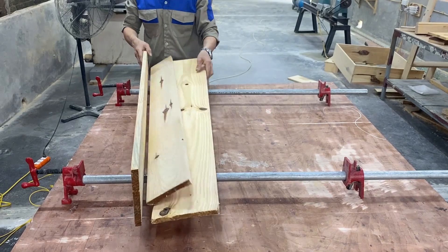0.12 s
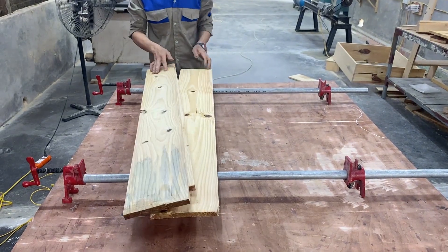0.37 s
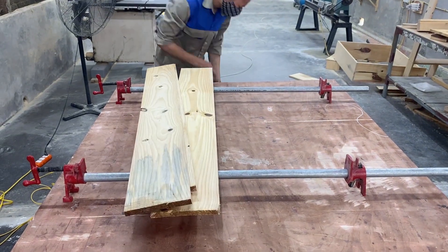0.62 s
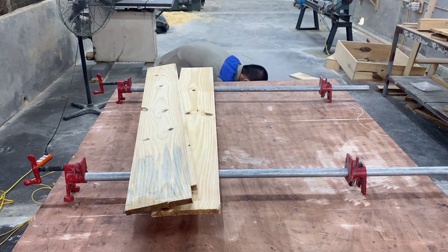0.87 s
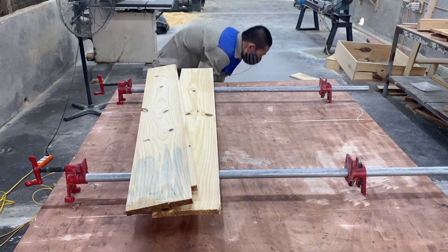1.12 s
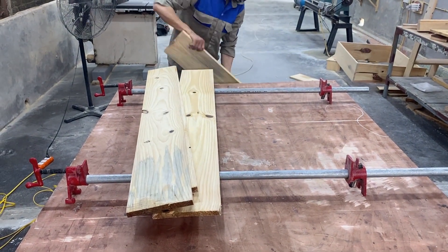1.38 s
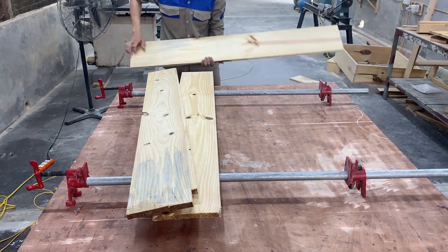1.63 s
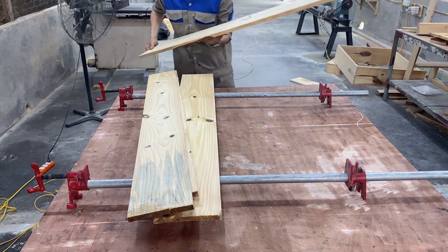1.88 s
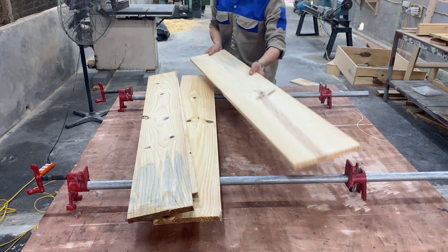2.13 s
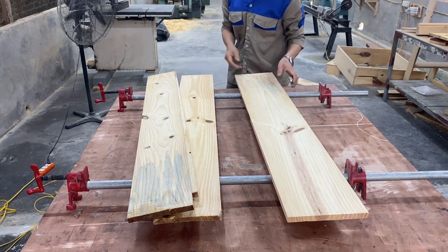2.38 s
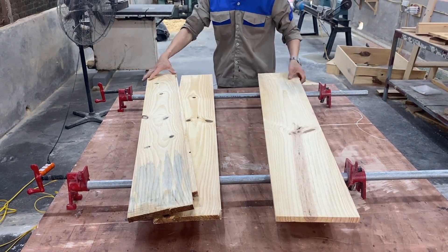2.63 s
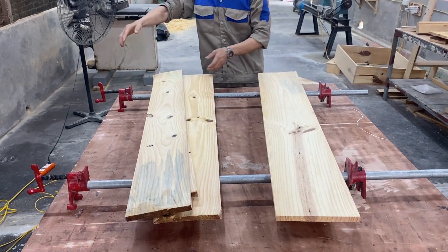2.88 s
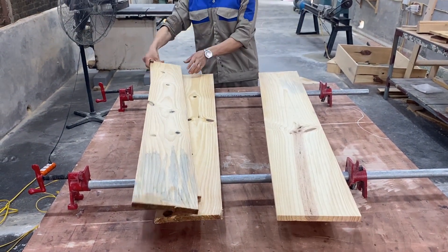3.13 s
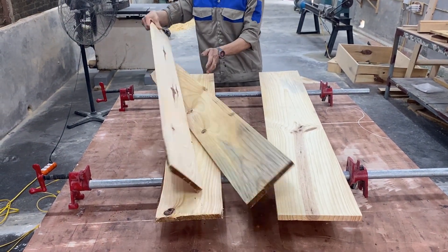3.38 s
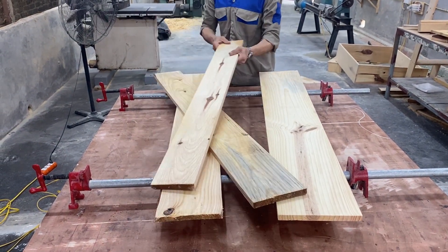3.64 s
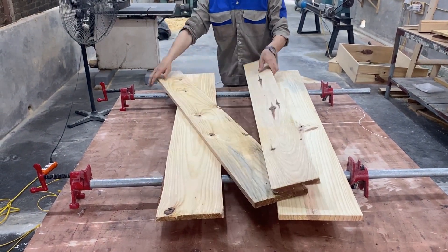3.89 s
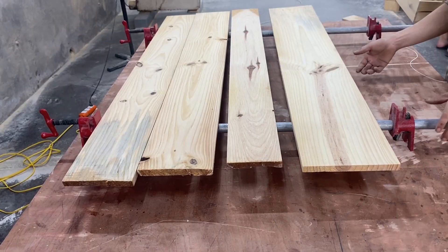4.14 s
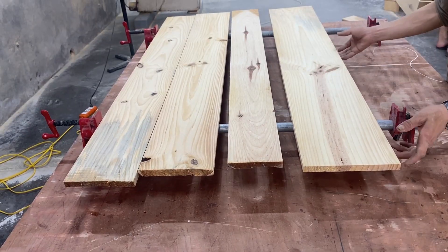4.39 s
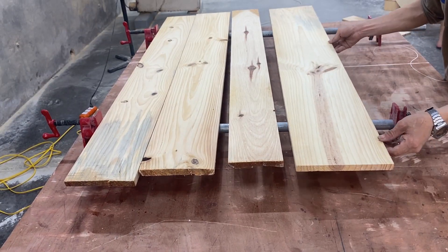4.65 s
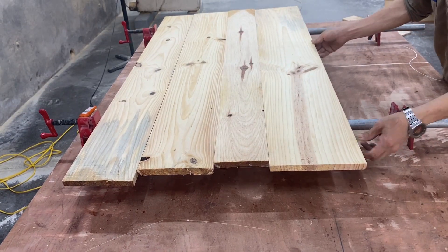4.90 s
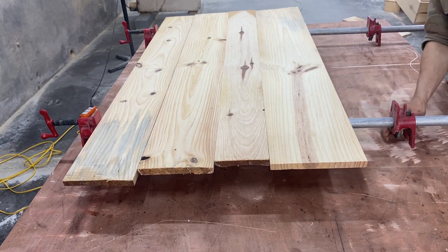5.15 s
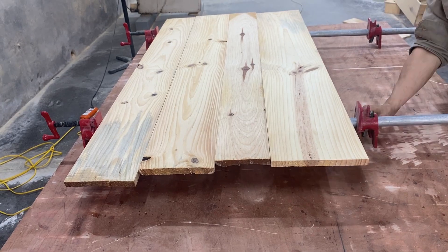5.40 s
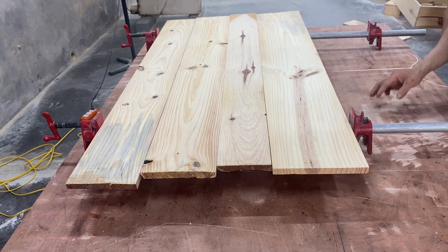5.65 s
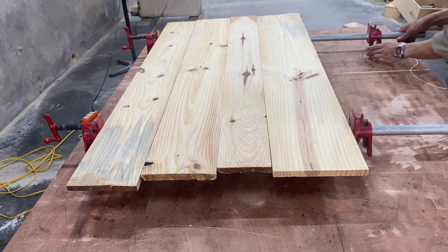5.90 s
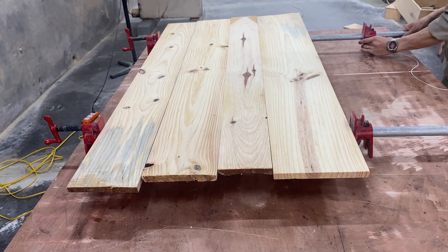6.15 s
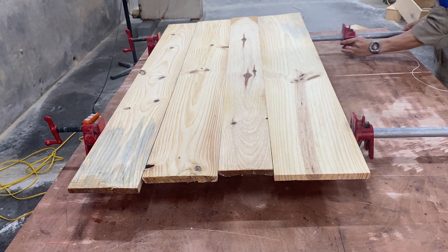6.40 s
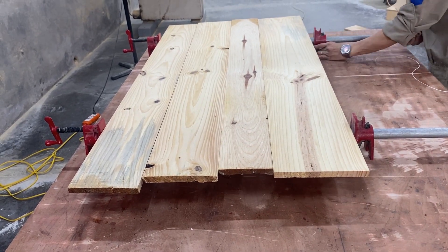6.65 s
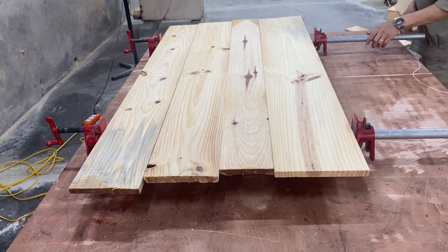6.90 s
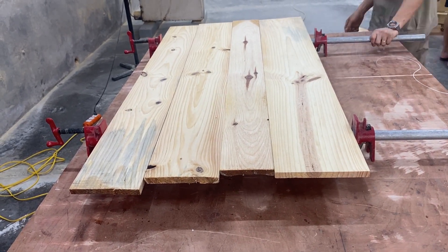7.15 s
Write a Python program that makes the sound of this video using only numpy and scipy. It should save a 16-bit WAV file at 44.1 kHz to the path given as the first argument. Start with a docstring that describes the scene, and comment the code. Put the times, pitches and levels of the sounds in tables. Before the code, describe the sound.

In a large workshop with a short echo, heard close to the bench, several pine boards clatter down in hard, dry knocks from 0.1 to 0.4 s, with low bench rumble. From 0.5 to 2.1 s it is nearly quiet, with faint scrapes and a soft wood rub near 1.3. Another board lands at 2.2-2.35, settling with lighter knocks until 2.9. Boards rasp and clack at 3.1-3.5, with a sharp snap at 3.45, and a hard hit at 3.83. A distant bird whistles faintly at 3.0-3.2, then more clearly at 3.95-4.4. Sound briefly vanishes at 3.93; afterwards the thin hiss is louder. Boards slide together, striking at 4.75. Steel scrapes, high ringing and clamp rattle come at 5.3, a solid knock at 5.6, then busy knocks, rasps and rattles from 6.1 to 6.9. A low rumble swells before another tiny dropout at 7.2.

```python
"""Boards at work in a large workshop, with a thin hiss of coloured noise that is louder after 3.9 s.
From the start pine boards are dropped, knocked together and slid over steel clamp pipes on a bench; a low
rumble of coloured noise swells as they are moved. Blows ring boards and bench as dying tones; random slips
make wood rasp, steel hiss with grit, and pipes sing near 8 kHz. A bird, made of wavering sines, whistles far
off from 3 s; sound almost vanishes before 4 s and at 7.2 s; from 5.3 s a loose clamp jaw rattles under jolts."""
import sys
import numpy as np
from scipy import signal
from scipy.fft import rfft, irfft
from scipy.io import wavfile
from scipy.ndimage import uniform_filter1d

SR = 44100
rng = np.random.default_rng(int(sys.argv[2]) if len(sys.argv) > 2 else 0)


def amplitude_ratio(level_db):
    """Convert a level in decibels to the matching linear amplitude (field) ratio."""
    exponent = np.asarray(level_db, float) / 20
    return 10 ** exponent


def master(y):
    """Save y as 16-bit WAV."""
    cut = np.clip(np.atleast_2d(y).T, -1, 1)
    pcm = np.round(cut * 32767)  # scale
    wavfile.write(sys.argv[1], SR, pcm.astype(np.int16))


N = 320695  # length in samples

# Low rumble of the bench as boards are moved, colour: [f/Hz, relative level per Hz/dB]
RUMBLE_COLOUR = [(12, -28.5), (20, -6.5), (48, -12.5), (91, -1.5), (145, -11), (183, -14.5), (282, -32),
                 (320, -30), (420, -54), (700, -120)]
# Low rumble of the bench, typical loudness over time: [t/s, level/dB]
RUMBLE_LEVEL = [(0.0, -28), (0.22, -48), (0.4, -28.5), (0.58, -50), (1.0, -53), (1.31, -56), (2.2, -59),
                (2.35, -35), (2.69, -59), (2.83, -44), (3.15, -60), (3.501, -37.5), (3.81, -46),
                (4.07, -43.5), (4.82, -41), (5.37, -43.5), (5.67, -35.5), (5.93, -51.5), (6.36, -38.5),
                (6.84, -35), (7.15, -27.5), (7.27, -40.5)]
# Thin hiss of the hall, colour of the noise: [f/Hz, relative level per Hz/dB]
AIR_COLOUR = [(120, -26), (200, -4), (397, -10), (748, -9), (880, -12.5), (1510, -16.5), (1810, -15),
              (4390, -27.5), (4980, -19), (6530, -17.5), (8260, -33), (15000, -49)]
# Thin hiss of the hall, typical loudness over time: [t/s, level/dB]
AIR_LEVEL = [(0, -68.5), (3.93, -63.5), (3.94, -58), (7.27, -56.5)]
# Wood dragged over wood or steel:
# [peak t/s, rise/s, fall/s, rasp level before a 1 dB lift/dB, pitch that rings most f/Hz,
#  grind against rasp before a 4 dB lift/dB]
SLIDES = [(.008, .008, .15, -37.5, 347, -19.5), (.125, .1, 0.009, -42.5, 850, -14.5),
          (1.016, .012, .1, -59.5, 714, -21), (1.15, 0.009, .3, -46.5, 910, -16),
          (1.33, .2, .2, -34, 855, -14), (1.826, .03, 0.052, -58, 550, -9.5),
          (1.95, .12, .3, -65, 650, -4.5), (2.18, 0.33, .02, -64, 896, -12),
          (2.292, .04, 0.031, -29, 760, -37), (2.36, .05, 0.19, -25, 840, -24),
          (2.89, .01, .13, -21, 855, -25.5), (3.26, .01, 0.18, -24, 960, -25.5),
          (3.312, .04, 0.09, -17, 970, -40), (3.48, .01, 0.31, -37, 690, -11),
          (3.62, .35, .14, -33.5, 1220, -16.5), (3.96, .01, 0.085, -41, 500, -26),
          (4.068, .1, 0.16, -44, 375, -9), (4.228, .2, .3, -55.5, 510, -17),
          (4.418, .3, .25, -53.5, 900, -10), (4.75, .13, 0.011, -28.5, 940, -22.5),
          (4.898, .09, .14, -32.5, 420, -20), (5.0, .01, 0.24, -51, 392, -17),
          (5.176, .3, 0.32, -56.5, 530, -14), (5.24, .03, .08, -57.5, 1300, 3),
          (5.289, .006, .25, -29, 1290, -23), (5.345, .07, .1, -23.5, 1040, -23),
          (5.475, .025, .2, -32, 860, -25), (5.7, .02, .25, -37, 360, -29),
          (6.0, .3, 0.23, -58.5, 600, -10), (6.138, .07, 0.076, -27.5, 785, -24),
          (6.28, 0.18, 0.053, -42.5, 440, -22), (6.37, .08, .01, -22, 350, -28),
          (6.42, .03, 0.38, -25.5, 680, -20.5), (6.54, .1, .1, -31, 905, -27),
          (6.68, .01, .12, -37.5, 387, -17), (6.76, .1, 0.036, -43, 360, -10),
          (6.82, .01, .1, -36.5, 435, -17), (6.99, .3, 0.44, -36.5, 355, -16),
          (7.195, .5, .02, -35.5, 360, -17.5), (7.26, .04, .02, -56, 385, 10.5)]
# Typical tones of a board ringing freely: [f/Hz, level/dB, time to die by 60 dB t/s]
BOARD_MODES = [(217.4, -6, 0.056), (272.5, -0.5, 0.049), (346.8, 1.5, 0.037), (437.8, -3, 0.042),
               (515.2, -5, 0.045), (599.6, -4, 0.044), (663, -4, 0.041), (760, -4, 0.032),
               (845, -3.5, 0.044), (962, -0.5, 0.024), (1090, -3, 0.039), (1183.5, -5.5, 0.028),
               (1329.6, -1, 0.026), (1400, 0.5, 0.029), (1614, -4, .025), (1797, -8, 0.022),
               (2029, -11, 0.029)]
# Dull grind of a stroke, colour: [f/Hz, relative level per Hz/dB]
GRIND_COLOUR = [(1100, -23.5), (1800, 3), (2800, 1.5), (4500, -10.5), (7000, -24), (11000, -42.5)]
# Treble of strokes, sliding steel and snaps, colour: [f/Hz, relative level per Hz/dB]
TREBLE_COLOUR = [(2500, -21), (4500, 2.5), (7000, -2), (10000, -2), (15000, -11.5), (16000, -20)]
# Gritty hiss of steel sliding on steel: [peak t/s, rise/s, fall/s, level/dB]
STEEL_SLIDES = [(0.032, .03, .3, -62.5), (1.32, 0.36, .5, -63.5), (1.898, .15, 0.99, -69.5),
                (3.47, .01, 0.27, -62.5), (4.075, .08, .15, -57.5), (4.418, .3, .2, -69),
                (4.749, 0.12, .02, -53), (5.06, .08, 0.22, -58), (5.32, 0.064, .17, -43.5),
                (5.5, .15, 0.36, -60.5), (5.75, 0.27, .3, -72), (5.9, 0.011, .4, -61),
                (6.141, .05, 0.098, -50), (6.42, 0.083, 0.38, -43), (6.499, 0.11, 0.16, -47),
                (6.69, .03, .4, -57), (6.85, .005, .15, -49), (6.89, 0.017, 0.28, -46.5),
                (6.95, .15, .04, -50), (7.195, .6, .02, -57), (7.245, .03, 0.091, -49.5)]
# How long the hall echoes at each pitch: [f/Hz, time to die by 60 dB t/s]
HALL_DECAY = [(80, 0.5), (250, 0.5), (800, 0.3), (2000, 0.33), (5000, 0.36), (12000, 0.24)]
# Blows: [t/s, level before a 2 dB lift/dB, pitch that rings most f/Hz,
#         bench thump against board peak/dB, crack against board peak/dB]
KNOCKS = [(0.104, -36, 1350, -30, -30), (0.133, -5, 1333, -25.5, -17), (0.192, -3.5, 1130, -19.5, -9),
          (0.256, -6.5, 1140, -28, -10.5), (0.394, -5, 908, -17, -12), (0.401, -6, 1050, -25, -16),
          (0.694, -54, 1620, -30, -22), (1.142, -34, 1630, -22, -15.5), (1.886, -47, 794, -19, -21),
          (2.152, -49, 658, -1, -4.5), (2.2, -8.5, 1070, -13.5, -19.5), (2.253, -7, 1430, -27, -19),
          (2.34, -9.5, 1110, -20.5, -16.5), (2.519, -24, 570, -16, -22), (2.627, -12.5, 1234, -19, -20),
          (2.659, -20.5, 1400, -16, -23.5), (2.702, -35, 1390, -3, -14), (2.83, -19, 1495, -15, -18.5),
          (2.874, -13.5, 1164, -11, -21), (2.897, -13.5, 1090, -16, -15.5), (3.112, -23, 1160, -6.5, -22),
          (3.237, -15.5, 1410, -10.5, -20), (3.279, -10.5, 1050, -12, -16), (3.308, -9.5, 1440, -15, -16),
          (3.329, -12.5, 585, -15.5, -20.5), (3.448, -4.5, 1310, -27.5, -9.5),
          (3.831, -4, 1375, -27.5, -19.5), (3.859, -19.5, 1080, -6, -27), (3.947, -23, 664, -7, -17.5),
          (4.754, -4, 1010, -27, -15.5), (4.769, -13, 1090, -46, -19.5), (4.797, -11.5, 590, -18, -18.5),
          (5.156, -38, 453, -19, -16.5), (5.349, -13.5, 1090, -20, -21.5), (5.389, -21, 1090, -37, -27),
          (5.413, -22, 520, -29, -29), (5.606, -3, 620, -17.5, -19), (5.639, -15, 650, -11.5, -30),
          (5.77, -30, 1100, -15, -18), (6.131, -15, 830, -22, -21.5), (6.292, -17, 780, -16, -17),
          (6.339, -15.5, 760, -9.5, -21.5), (6.384, -5, 1000, -34, -17), (6.419, -17.5, 547, -27, -21.5),
          (6.464, -15, 453, -30, -16), (6.525, -18.5, 1370, -32, -18), (6.611, -2, 1030, -38, -23.5),
          (6.629, -9.5, 1150, -14.5, -21), (6.665, -34, 650, -21, -18), (6.782, -7, 706, -11.5, -17.5)]
# Typical tones of the bench: [f/Hz, level/dB, time to die by 60 dB t/s]
BENCH_MODES = [(57, -8, .35), (76.8, -9.5, 0.66), (94.2, -4.5, 0.51), (118.2, -5, 0.38), (147.6, -3, .25),
               (180.7, -2.5, .2)]
# Snap of a blow, colour before its hardness is counted in: [f/Hz, relative level per Hz/dB]
CRACK_COLOUR = [(900, -28.5), (1700, -3.5), (2400, -5), (3400, -9), (4600, -17.5), (6100, -24.5),
                (9000, -30), (15500, -42.5)]
# Pipe song: [peak t/s, rise/s, fall/s, level before a 3 dB lift/dB]
SINGING = [(.196, 0.013, 0.18, -53), (.408, 0.037, .06, -50.5), (2.202, 0.0039, 0.15, -54),
           (2.35, .03, 0.12, -63), (2.632, 0.0033, 0.042, -65), (2.898, .04, .08, -62),
           (3.237, 0.0033, 0.043, -62.5), (3.281, .035, .1, -58.5), (3.833, 0.0037, .06, -57),
           (3.952, 0.0031, .055, -56.5), (4.749, .12, .07, -54), (5.07, .06, 0.054, -61),
           (5.325, .06, .11, -40.5), (5.48, .1, .15, -61.5), (6.145, .025, 0.022, -40),
           (6.301, 0.12, 0.026, -65), (6.418, 0.077, 0.19, -41.5), (6.615, .02, 0.037, -47.5)]
# Typical tones of a steel pipe: [f/Hz, level/dB, time to die by 60 dB t/s]
PIPE_MODES = [(8040, -5, 0.016), (8000, -3, 0.032), (8380, -6, .015), (8640, -5, .015)]
# Dry snaps of steel parts: [t/s, peak level/dB]
TICKS = [(0.1927, -40), (2.2, -47.5), (2.251, -42.5), (2.34, -45.5), (3.4467, -21.5), (3.831, -35),
         (4.4034, -50), (4.755, -39.5), (5.0638, -42), (5.4588, -43), (5.6036, -34.5), (5.896, -47),
         (6.1446, -31.5), (6.6151, -32), (6.6653, -39.5), (6.7857, -39.5), (6.8466, -43.5)]
# Notes of the bird: [start t/s, end t/s, start f/Hz, end f/Hz, typical level/dB]
BIRD_NOTES = [(2.995, 3.119, 4210, 4270, -64.5), (3.135, 3.23, 3960, 4010, -63.5),
              (3.945, 4.0, 4880, 4860, -53), (4.014, 4.162, 4600, 4490, -54.5),
              (4.172, 4.304, 4070, 4076, -52), (4.303, 4.401, 3750, 3720, -51.5),
              (4.425, 4.49, 3790, 3760, -69)]
# Rattles of the loose clamp jaw: [peak t/s, rise/s, fall/s, level before a 3 dB lift/dB]
RATTLING = [(5.295, 0.0093, .2, -53), (5.34, 0.042, .15, -46), (6.147, .022, 0.038, -45),
            (6.179, 0.016, .09, -54), (6.386, .01, .2, -46), (6.456, .03, 0.19, -45),
            (6.53, .05, 0.12, -56), (6.784, .005, 0.068, -47)]
# Typical tones of the clamp jaw: [f/Hz, level/dB, time to die by 60 dB t/s]
JAW_MODES = [(3130, -4, 0.05), (3870, -0.5, 0.077), (4310, -4.5, 0.036), (4630, -1, 0.058),
             (5400, -7, 0.062)]
# Gaps where the sound almost vanishes: [start t/s, end t/s]
GAPS = [(3.928, 3.943), (7.2, 7.222)]


def evened(x):
    """Scales a sound to an average (rms) level of 1."""
    return x / np.sqrt(np.mean(x ** 2) + 1e-20)


def read(points, hz):
    """Reads a table between its points, with pitch on a log scale."""
    f, value = np.transpose(points)
    return np.interp(np.log(hz + 1), np.log(f + 1), value)


def add(mix, s, sound):
    """Mixes a sound in at s seconds, cut where the mix ends."""
    part = mix[:, round(s * SR):][:, :sound.shape[1]]
    part += sound[:, :part.shape[1]]


def coloured(x, spectrum):
    """Gives each channel a colour by raising or lowering its frequencies in dB."""
    hz = np.fft.rfftfreq(x.shape[-1], 1 / SR)
    gain = amplitude_ratio(read(spectrum, hz))
    return irfft(rfft(x) * gain, x.shape[-1])


def smoothed(x, width):
    """Averages over neighbours twice, then evens the level: a slow random drift."""
    return evened(uniform_filter1d(uniform_filter1d(x, width), width))


def ring(modes, length, rise, lift_db=0, detune=.02, scatter_db=3.0):
    """Sums dying tones, each a close pair; low ones start slower and each channel draws its own."""
    hz, db, t60 = np.transpose(modes)[..., None]
    t = np.arange(round(length * SR)) / SR
    # axes: two tones of a pair, two channels, modes, then time
    draw = rng.standard_normal((2, 2, len(modes), 2))
    phase = 2 * np.pi * rng.random((2, 2, len(modes), 1))
    mode_rise = rise * (hz.mean() / hz) ** 0.41
    onset = (1 - np.exp(-t / mode_rise)) ** 3.47
    size = onset * amplitude_ratio(db + lift_db + scatter_db * draw[..., :1] - 60 * t / t60)
    pitch = hz * (1 + detune * draw[..., 1:])
    return (size * np.sin(2 * np.pi * pitch * t + phase)).sum((0, 2))


def favour(hz, peak_db, slope_db, tilt_db=0):
    """The place of contact lifts board tones near one pitch; tilt brightens or dulls them."""
    octaves = np.log2(np.transpose(BOARD_MODES)[0][:, None] / hz)
    return peak_db * np.exp(-(octaves / 0.11) ** 2) - slope_db * abs(octaves) + tilt_db * octaves


def swell(rise, fall):
    """Gain that climbs 32 dB to its peak and sinks again, with faded ends."""
    rise, fall = max(rise, .003), max(fall, .003)
    t = np.arange(-rise, fall, 1 / SR)
    away = np.where(t < 0, -t / rise, t / fall)
    ends = np.clip(np.minimum(t + rise, fall - t) / 0.0022, 0, 1)
    return amplitude_ratio(-32 * away ** 1.155) * ends  # a bend over 1 rounds the top


def random_slips(count, per_s, spread_db):
    """Uneven clicks at random moments: the slips and jolts of rubbing parts."""
    size = rng.exponential(1, count)
    happens = rng.random(count) < per_s / SR
    sign = rng.standard_normal((2, count))
    return amplitude_ratio(spread_db * np.minimum(size, 5)) * happens * sign


def rough(slips):
    """Blurs the slips with plain noise."""
    return evened(slips) + 1.4 * rng.standard_normal(slips.shape)


def steady(spectrum, curve, alike, patchy_db):
    """Rumble or hiss: noise of one colour with a drifting level, partly related between channels."""
    a, b, lumps = rng.standard_normal((3, N))
    second = alike * a + np.sqrt(1 - alike ** 2) * b
    noise = evened(coloured(np.array([a, second]), spectrum))
    level_db = np.interp(np.arange(N) / SR, *np.transpose(curve))
    return noise * amplitude_ratio(level_db + patchy_db * smoothed(lumps, 1500))


def slide(rise, fall, rasp_db, pitch_hz, grind_db):
    """Slips drive the ringing board, with a dull grind and a thin hiss on top."""
    fade = swell(rise, fall)
    slips = random_slips(len(fade), 1600., 2.8)
    body = ring(BOARD_MODES, .07, 0.00047, favour(pitch_hz, 2.4, 4.2), 0.037)
    rasp = evened(signal.fftconvolve(slips, body, axes=1)[:, :len(fade)])
    grain = rough(slips)
    grind = amplitude_ratio(grind_db + 4.0) * evened(coloured(grain, GRIND_COLOUR))
    thin = amplitude_ratio(-47) * evened(coloured(grain, TREBLE_COLOUR))
    return amplitude_ratio(rasp_db + 1.0) * (rasp + grind + thin) * fade


def steel_slide(rise, fall, db):
    """Steel slides on steel with a gritty hiss: uneven slips and noise, coloured to treble."""
    fade = swell(rise, fall)
    grit = rough(random_slips(len(fade), 1200., 2.4))
    return amplitude_ratio(db) * fade * evened(coloured(grit, TREBLE_COLOUR))


def hall(x):
    """Echoes from sparse clicks of random sign, each pitch dying at its own speed."""
    taps = np.zeros((2, SR))
    count = (SR - 301) // 20
    at = np.arange(300, SR - 20, 20) + rng.integers(0, 20, (2, count))  # other taps in each channel
    np.put_along_axis(taps, at, rng.choice([-1., 1.], at.shape), 1)
    hz, t, bands = signal.stft(taps, SR, nperseg=512)
    decay = amplitude_ratio(-60 * t / read(HALL_DECAY, hz)[:, None])
    tail = signal.istft(bands * decay, SR, nperseg=512)[1]
    tail = tail / np.linalg.norm(tail[0])
    return amplitude_ratio(-6.5) * signal.fftconvolve(x, tail, axes=1)[:, :N]


def knock(level_db, hz, thump_db, crack_db):
    """A blow rings board and bench and snaps; returned as heard close and as sent to the hall."""
    t = np.arange(4096) / SR
    rise = 0.0029  # s, sets how fast the board and the crack start
    tilt_db = 0.35 * (crack_db + 14.0)  # hard blows are brighter

    bench = ring(BENCH_MODES, 0.32, 0.0055, detune=.04)
    bench = amplitude_ratio(thump_db) * bench / abs(bench).max()

    colour = [(f, db + 0.27 * (crack_db + 0.5) * np.log2(f / 2400)) for f, db in CRACK_COLOUR]
    crack = coloured(rng.standard_normal((2, len(t))), colour)
    crack = crack * (1 - np.exp(-t / (0.46 * rise))) ** 2 * np.exp(-t / 0.016)
    crack = amplitude_ratio(crack_db) * crack / abs(crack).max()

    # ringing is shorter while the board still presses on what it struck
    pressed = [(f, db, 0.66 * t60) for f, db, t60 in BOARD_MODES]
    close = ring(pressed, .09, rise, favour(hz, 9.2, 3.5, tilt_db), 0.023)
    chatter = ring(BOARD_MODES, .09, rise, favour(hz, 9.7, 2.5, tilt_db), .04)
    add(close, .008, amplitude_ratio(-10.0) * chatter)  # the board chatters once
    # the hall hears the board's tones more evenly
    wide = ring(BOARD_MODES, .09, rise, favour(hz, 2.0, 1.1, tilt_db), 0.052)

    both = np.array([bench, bench])
    for mix, board in zip(both, (close, wide)):
        add(mix, 0, board / abs(board).max())
        add(mix, 0, crack)
    return amplitude_ratio(level_db + 2.0) * both


def steel(fade, db, modes, per_s):
    """Slips and jolts keep a steel part ringing."""
    body = ring(modes, .07, 0.00037, detune=.006, scatter_db=4.0)
    slips = random_slips(len(fade), per_s, 3.)
    ringing = signal.fftconvolve(slips, body, axes=1)[:, :len(fade)]
    return amplitude_ratio(db) * fade * evened(ringing)


def sing(rise, fall, db):
    """The pipe sings under dense slips, about 1200 a second."""
    return steel(swell(rise, fall), db + 3., PIPE_MODES, 1200.)


def tick(peak_db):
    """A steel part snaps: a short burst of treble noise that swells and dies at once."""
    t = np.arange(1500) / SR
    noise = coloured(rng.standard_normal((2, len(t))), TREBLE_COLOUR)
    snap = noise * t * np.exp(-t / 0.0017)
    return amplitude_ratio(peak_db) * snap / abs(snap).max()


def bird(start, end, from_hz, to_hz, db):
    """A gliding sine whistle that flutters and wavers as it carries through the hall."""
    t = np.arange(start, end, 1 / SR)
    flutter, waver = (smoothed(v, 220) for v in rng.standard_normal((2, 2, len(t))))
    pitch = np.linspace(from_hz, to_hz, len(t)) + 28. * waver
    phase = 2 * np.pi * (np.cumsum(pitch, 1) / SR + rng.random((2, 1)))
    return amplitude_ratio(db + 4.5 * flutter) * np.sin(phase) * signal.windows.tukey(len(t), .4)


def rattle(rise, fall, db):
    """The loose jaw chatters under sparser jolts, about 170 a second."""
    return steel(swell(rise, fall), db + 3.0, JAW_MODES, 170.)


def scene():
    """Places rumble, hiss, strokes, blows and bird in time; all but rumble and hiss echo in the hall."""
    blows, sent, rest = np.zeros((3, 2, N))
    for source, table in ((slide, SLIDES), (steel_slide, STEEL_SLIDES), (sing, SINGING), (rattle, RATTLING)):
        for s, rise, *row in table:
            add(rest, max(s - rise, 0), source(rise, *row))
    for s, *row in KNOCKS:
        close, wide = knock(*row)
        add(blows, s - .003, close)
        add(sent, s + .006, wide)  # the first walls answer late
    for s, db in TICKS:
        add(rest, s - .001, tick(db))
    for note in BIRD_NOTES:
        add(rest, note[0], bird(*note))
        add(sent, note[0], 0.75 * bird(*note))  # its notes hang in the hall
    rumble = steady(RUMBLE_COLOUR, RUMBLE_LEVEL, -0.2, 3.3)
    air = steady(AIR_COLOUR, AIR_LEVEL, 0.037, 0.64)
    return blows + hall(sent + 0.31 * rest) + rest + rumble + air


def top_cut(x):
    """Nothing passes above the cut-off."""
    return signal.sosfilt(signal.butter(12, 16120, fs=SR, output="sos"), x)


def record(dry):
    """Twice the sound fades almost to silence within 4 ms and returns as fast."""
    t = np.arange(N) / SR
    for start, end in GAPS:
        outside = np.maximum(start - t, t - end)  # s away from the gap
        dry = dry * np.clip(outside / .004, .002, 1)
    return top_cut(dry)


dry = scene()
out = record(dry)
master(out)
```